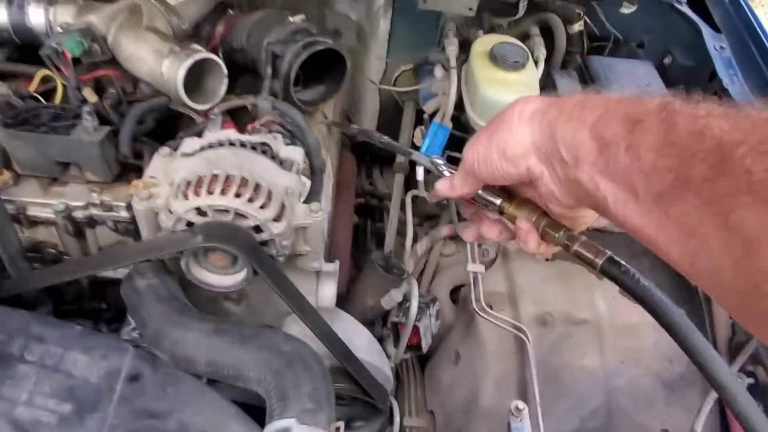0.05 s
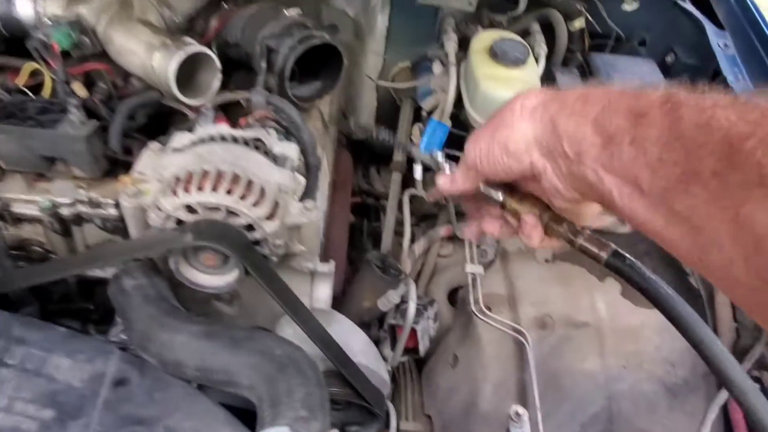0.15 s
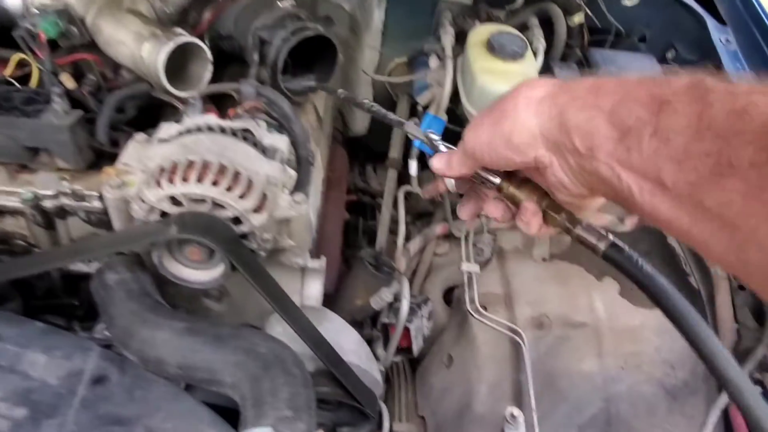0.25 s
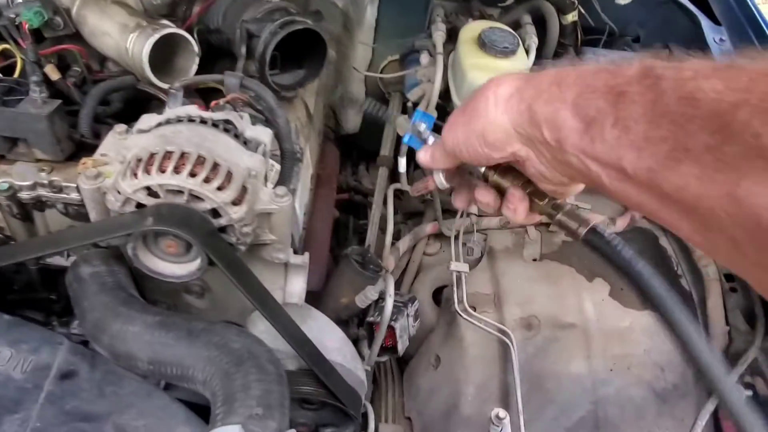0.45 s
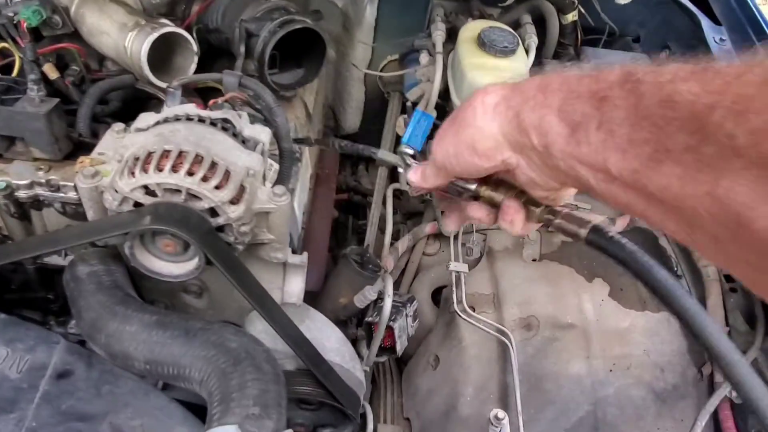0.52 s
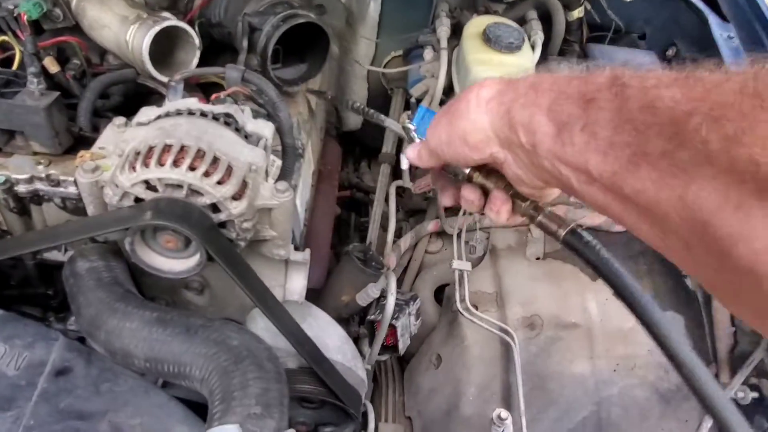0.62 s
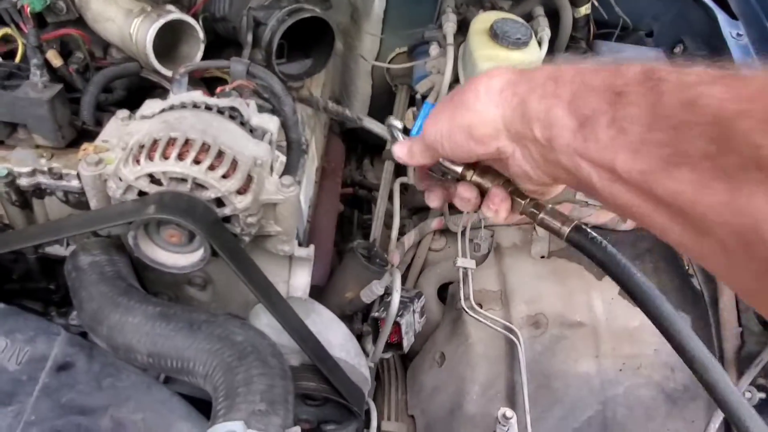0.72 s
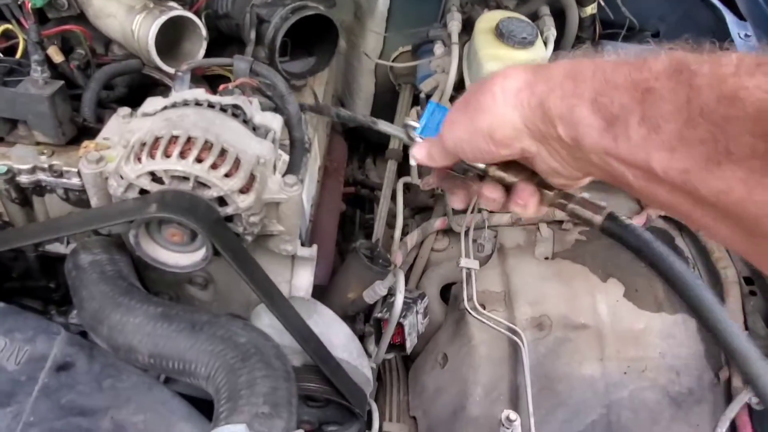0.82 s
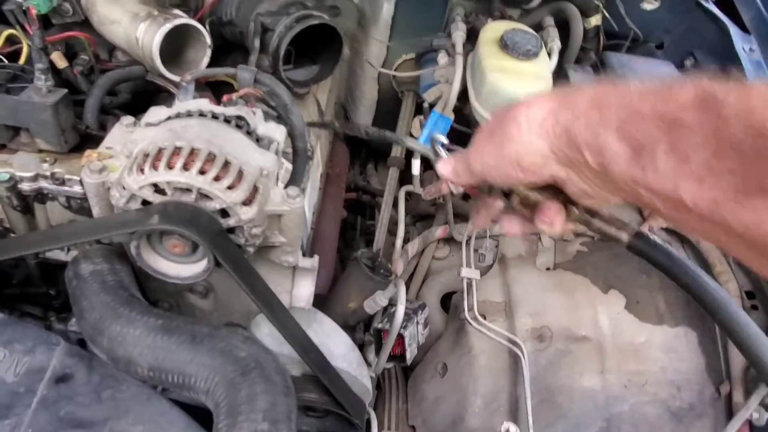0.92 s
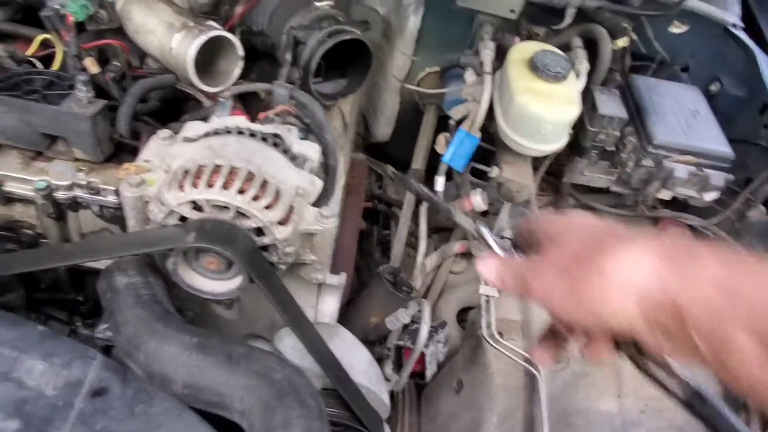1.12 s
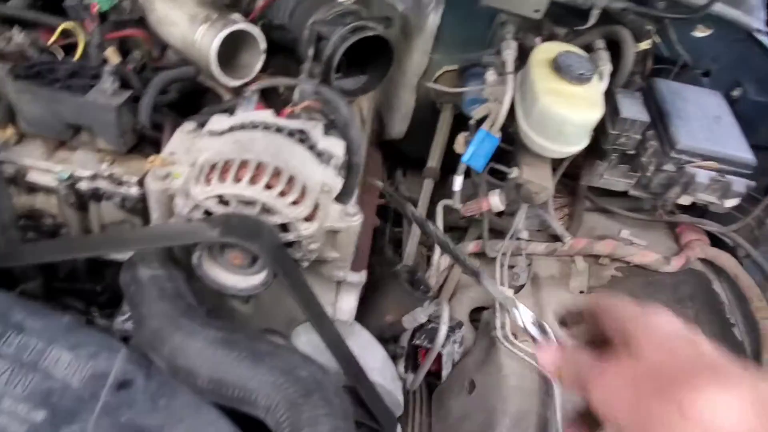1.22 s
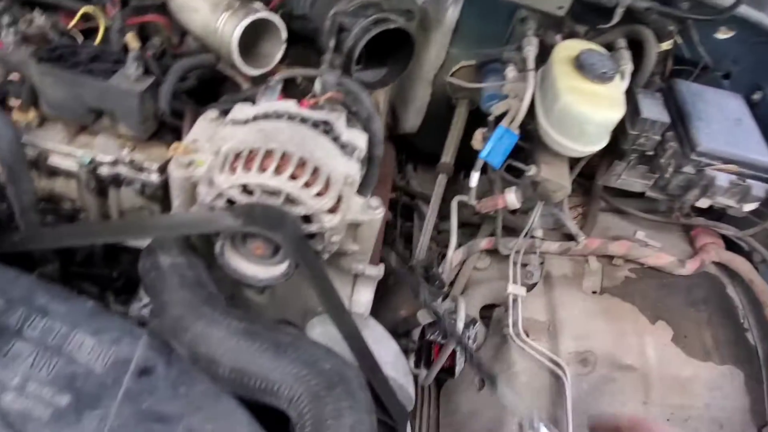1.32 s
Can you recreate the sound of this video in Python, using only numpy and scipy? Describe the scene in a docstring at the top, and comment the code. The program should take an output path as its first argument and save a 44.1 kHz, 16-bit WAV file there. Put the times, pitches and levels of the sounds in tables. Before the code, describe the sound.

A long hissing blast of compressed air sweeps over engine parts, flickering, then cuts off sharply

```python
"""Blow gun over an engine

One long blast of compressed air sweeps over an engine, an arm's length from a camera: flickering bands
of noise for the free jet's hiss and its roar on edges and faces, narrow noise for ringing pipes and hollows.
Leaking-valve noise starts before the blast and swells under it; a compressor motor hums in harmonics over
a low garage noise. Soft one-cycle thumps come before the blast, and after it as the gun is drawn back."""
import sys
import numpy as np
from scipy import signal
from scipy.fft import rfft, irfft
from scipy.io import wavfile
from scipy.ndimage import uniform_filter1d, map_coordinates

SR = 44100
rng = np.random.default_rng(int(sys.argv[2]) if len(sys.argv) > 2 else 0)


def dump(signal):
    """Clip the signal to [-1, 1] and save it as 16-bit WAV at the path in sys.argv[1]."""
    limited = np.clip(np.atleast_2d(signal).T, -1, 1)
    pcm = np.round(limited * 32767).astype(np.int16)
    wavfile.write(sys.argv[1], SR, pcm)


N = 59535
T = np.arange(N) / SR  # s
HZ = np.arange(N // 2 + 1) * SR / N
PORT_LINK = .3  # share of the side that follows the mid


def undb(db):
    """Decibels to an amplitude factor."""
    return 10 ** (np.asarray(db) / 20)


def level(x, db):
    """Scale a sound to an RMS level in dB."""
    return x * undb(db) / np.sqrt(np.mean(x ** 2))


def curve(table, col=1):
    """A column of a table, joined by straight lines in time."""
    table = np.array(table)
    return np.interp(T, table[:, 0], table[:, col])


def on_hz(table, hz):
    """A spectrum table read on a log-frequency axis."""
    table = np.array(table)
    return np.interp(np.log(hz + 1), np.log(table[:, 0]), table[:, 1])


def walk(rate):
    """Random levels held 1 / rate s and slewed twice; spread near 1."""
    hold = int(SR / rate)
    steps = np.repeat(rng.standard_normal(N // hold + 1), hold)
    slewed = uniform_filter1d(uniform_filter1d(steps, hold), hold)
    return 1.25 * slewed[:N]


def noise(gain, side_db):
    """Left and right noise with a gain per frequency; part of the side is the mid turned a quarter cycle."""
    mid, side = rfft(rng.standard_normal((2, N))) * gain
    side = np.sqrt(1 - PORT_LINK ** 2) * side + 1j * PORT_LINK * mid
    side = side * undb(side_db)
    return irfft(np.array([mid + side, mid - side]), N)


def bands(table, lo_hz, hi_hz, side_db, flicker_db, rate, count=3):
    """Noise of a given colour in about count overlapping bands an octave, each flickering alone."""
    edge = np.geomspace(lo_hz, hi_hz, 2 + int(count * np.log2(hi_hz / lo_hz)))
    step = np.log(edge[1] / edge[0])
    colour = undb(on_hz(table, HZ))
    out = 0
    for centre in np.sqrt(edge[1:] * edge[:-1]):
        steps_away = np.clip(np.log((HZ + 1) / centre) / step, -1, 1)
        share = np.cos(np.pi / 2 * steps_away)
        out = out + undb(flicker_db * walk(rate)) * noise(colour * share, side_db)
    return out


def resonance(hz, width_hz, side_db):
    """Air noise through one resonance, at unit RMS; the width is where the amplitude halves."""
    return level(noise(1 / (1 + ((HZ - hz) / (width_hz / 2)) ** 2), side_db), 0)


def garage_air():
    """Low, wide background noise that wavers slowly."""
    # Each row: frequency in Hz, relative density in dB per Hz.
    colour = [(20, -20), (50, -4), (110, -3), (220, -11), (310, -25), (450, -22), (700, -21), (1000, -28),
              (1600, -30)]
    return level(bands(colour, 23.2, 1500, side_db=-1, flicker_db=1.4, rate=7.5), -57)


def motor():
    """Multiples of the compressor's turning rate, loosely in step so that each stroke throbs."""
    # Each row: multiple of the turning rate, relative level in dB.
    harmonics = [(1, -5), (2, -3), (3, -10.5), (4, -7), (5, -12), (6, -12), (7, -14.5), (8, -15.5),
                 (9, -13.5), (10, -8), (11, -9.5), (12, -3.5), (13, -4.5), (14, -8), (15, -10), (16, -25),
                 (17, -12)]
    # Each row: time in seconds, level of the whole hum in dB.
    loudness = [(0, -56), (.2, -53), (.3, -59.5), (1.15, -59), (1.2, -62.5), (1.35, -63)]
    turn_hz, stroke_s = 57.64, .0075
    waver_db, slip_rad, spread_rad = 3.5, .9, .7
    turn = 2 * np.pi * turn_hz * (T - stroke_s)
    ear_phase = np.array([[0], [.6]])  # radians, left and right
    hum = 0
    for k, db in harmonics:
        strength = undb(db + waver_db * walk(14))
        slip = slip_rad * walk(5.92) + spread_rad * rng.standard_normal()
        hum = hum + strength * np.cos(k * turn + slip + ear_phase)
    return level(hum, 0) * undb(curve(loudness))


def thumps():
    """Dull bumps of about one cycle: a sine under a bell-shaped swell."""
    # Each row: centre in seconds, sine level before the swell in dB, frequency in Hz
    # (negative when the push comes first).
    bumps = [(.015, -48, 60), (.048, -49, 85), (.165, -49, 110), (.21, -49, 75), (1.205, -51, -110),
             (1.2278, -40.5, 75), (1.255, -53, -110), (1.2805, -48, 95)]
    cycles = .55  # half-length of the swell, to 1/e
    out = 0
    for s, db, hz in bumps:
        swell = np.exp(-((T - s) * hz / cycles) ** 2)
        out = out + undb(db) * swell * np.sin(2 * np.pi * hz * (T - s))
    return out


def valve_leak():
    """Air seeping through the valve: a thin flickering hiss that grows, then drops as the blast ends."""
    # Each row: frequency in Hz, relative density in dB per Hz.
    colour = [(590, -13), (1000, -4), (1050, -28), (1110, -12), (1780, -10.5), (2610, -13), (3400, -7),
              (6060, -13.5), (15800, -3.5)]
    # Each row: time in seconds, level in dB.
    loudness = [(0, -53), (.2, -46.5), (1.17, -34), (1.2, -56), (1.35, -54)]
    hiss = bands(colour, 924, 16270, side_db=0.48, flicker_db=2.44, rate=17.8)
    return level(hiss, 0) * undb(curve(loudness))


def buffeting(side_db):
    """Bass noise of the blast, surging in an upper and a lower band."""
    # Each row: time in seconds, upper band level in dB, lower band level in dB.
    surges = [(0.2, -71, -57), (0.26, -52.5, -58), (0.42, -61, -57.5), (0.47, -57, -77), (0.528, -54, -52),
              (0.584, -72, -80), (0.648, -57, -49.5), (0.7, -51.5, -83), (0.748, -72, -57.5),
              (0.846, -55.5, -72), (1.018, -72, -67), (1.034, -60.5, -60), (1.104, -66.5, -66),
              (1.2, -65, -52)]
    colour = [(35, -11), (250, 2.5)]  # Hz, relative dB per Hz
    out = 0
    for col, (lo, hi) in enumerate([(138, 253), (45.8, 124)], start=1):
        rumble = bands(colour, lo, hi, side_db, flicker_db=2.5, rate=25.7)
        out = out + level(rumble, 0) * undb(curve(surges, col))
    return out


def hollow_rings(side_db):
    """Hollows and gaps that ring briefly as the jet crosses them: narrow noise in bell-shaped swells."""
    # Each row: centre in seconds, half-length to 1/e in seconds, frequency in Hz, level at the crest in dB.
    hollows = [(0.235, 0.0055, 690, -40), (0.266, 0.025, 1257, -39.5), (0.305, 0.017, 2200, -37),
               (0.313, 0.032, 2180, -40), (0.31, 0.08, 7300, -35.5), (0.38, 0.02, 1800, -37),
               (0.36, 0.036, 1080, -45), (0.417, 0.012, 680, -42), (.431, 0.016, 2690, -34.5),
               (0.52, .008, 2750, -42), (.486, 0.0099, 3950, -35), (0.38, 0.016, 6100, -39.5),
               (0.474, 0.012, 507, -39.5), (0.492, 0.013, 2144, -37), (0.507, 0.012, 4100, -36.5),
               (0.477, 0.027, 1590, -37.5), (0.526, 0.016, 1160, -41), (0.644, 0.0095, 2900, -32),
               (0.636, 0.021, 4270, -41), (0.691, 0.022, 4060, -37), (0.684, 0.02, 1400, -40),
               (0.715, 0.022, 1933, -43.5), (0.799, 0.015, 6740, -31), (0.85, 0.031, 646, -43.5),
               (0.877, 0.012, 6240, -34), (0.517, 0.013, 6440, -35), (0.35, 0.014, 5500, -36),
               (1.154, 0.016, 5900, -34.5), (0.954, 0.012, 2045, -42), (1.047, 0.065, 2240, -43.5),
               (1.08, 0.028, 4300, -43), (1.12, .025, 3900, -41), (0.99, 0.012, 4225, -41)]
    out = 0
    for s, length, hz, db in hollows:
        swell = np.exp(-((T - s) / length) ** 2)
        ring = resonance(hz, 60 + .014 * hz, side_db)
        out = out + level(ring * swell, db) * np.sqrt(np.mean(swell ** 2))
    return out


def jet_roar(side_db):
    """Turbulent noise in six regions, with lasting metal resonances, as the jet sweeps over the parts."""
    # Each row: time in seconds, then levels in dB of: free jet hiss, sizzle on edges, roar on edges,
    # roar on faces, upper hollow, lower hollow.
    sweep = [(0.226, -31, -36.5, -41.5, -40, -36, -44), (0.26, -31.5, -34, -39.5, -41, -35.5, -43.5),
             (0.322, -30, -28, -35, -37, -37.5, -40), (0.346, -27.5, -29.5, -34, -38, -36.5, -48),
             (0.362, -32.5, -33, -39, -36.5, -38, -38.5), (0.408, -31.5, -38, -40.5, -44, -39.5, -42),
             (0.432, -28, -29, -29.5, -30, -38.5, -37.5), (0.462, -32.5, -36.5, -38, -38, -44, -45.5),
             (0.508, -27.5, -29.5, -36.5, -33, -41, -37.5), (0.524, -32, -31, -35.5, -37, -39.5, -41.5),
             (0.542, -31, -30.5, -34, -40, -45, -48), (0.556, -28, -39.5, -38.5, -52.5, -51, -54.5),
             (0.582, -29.5, -35, -42, -45.5, -63.5, -51.5), (0.61, -36.5, -42.5, -39.5, -47, -49, -62),
             (0.62, -30, -34.5, -33.5, -36, -38, -35), (0.63, -30, -28.5, -28, -39, -44, -55),
             (0.642, -32.5, -37.5, -36.5, -35, -44.5, -36.5), (0.672, -34, -40.5, -39, -43.5, -47, -61),
             (0.692, -29, -30.5, -27, -29.5, -42.5, -44), (0.706, -37, -36.5, -47, -47, -51, -46.5),
             (0.726, -31.5, -32, -33.5, -37, -44, -46.5), (0.752, -33.5, -41.5, -40, -53, -57, -53),
             (0.774, -29, -38, -39.5, -47, -48, -57), (0.786, -34, -31.5, -33.5, -40.5, -45, -50),
             (0.804, -24, -29, -33.5, -45, -44.5, -51.5), (0.836, -36, -41, -39.5, -46.5, -46, -41),
             (0.866, -29.5, -37.5, -39, -43.5, -46.5, -43.5), (0.878, -27.5, -30, -30.5, -41, -49, -44),
             (0.908, -26, -34, -48, -52, -61, -60), (0.926, -33.5, -39, -39, -50, -64, -49),
             (0.942, -27.5, -36.5, -35, -37, -45, -53), (0.96, -29, -31, -34.5, -38.5, -42.5, -42.5),
             (0.984, -40, -57, -50, -51.5, -59, -57), (1.034, -30.5, -36.5, -40.5, -40, -44.5, -44.5),
             (1.052, -35, -34, -36.5, -35, -51, -64), (1.072, -33, -43, -37, -35, -42.5, -48),
             (1.114, -31.5, -31.5, -39, -42, -51.5, -49), (1.148, -29.5, -30, -32.5, -39, -44, -50.5),
             (1.163, -39, -37, -34, -39.5, -49, -44.5)]
    # Borders of these regions in Hz, from the lower hollow up to the free jet.
    borders = [420, 1000, 1750, 3400, 6000, 10000, 15900]
    # Each row: frequency in Hz, relative density in dB per Hz.
    colour = [(300, -30), (385, -6), (432, -8), (485, -6.5), (654, 8.5), (927, -6), (1270, -4.5),
              (1800, -15), (1950, -14), (2680, -7), (2960, -14), (3990, -8), (5940, -11), (6450, -5.5),
              (8000, -9), (15800, -2)]
    # Lasting resonances. Each row: frequency in Hz, width in Hz, level in dB over the region's roar.
    metal = [(677, 270, -7.5), (1270, 240, -8), (15200, 510, -6.5)]
    flicker_db, flicker_rate, grit_db = 2.5, 29.98, 1  # rate in steps per second
    swing_db, swing_rate = 3, 25.06
    calm_hz = 5000  # regions that start above this flicker less
    grit = walk(700)
    out = 0
    for k, (lo, hi) in enumerate(zip(borders, borders[1:])):
        calm = min(1, calm_hz / lo)
        part = level(bands(colour, lo, hi, side_db, flicker_db * calm, flicker_rate, count=5), 0)
        for hz, width, db in metal:
            if lo <= hz < hi:
                ring = resonance(hz, width, side_db)
                swing = swing_db * calm * walk(swing_rate)
                part = part + ring * undb(db + swing)
        if k > 1:  # fine grit only above the two hollows
            part = part * undb(grit_db * grit)
        col = len(borders) - 1 - k  # the sweep lists the regions from the top down
        out = out + level(part, 0) * undb(curve(sweep, col))
    return out


def blast():
    """Roar, rings and buffeting of the air jet, opened and shut by the trigger."""
    # Width of the blast: a surface near the microphones turns some regions out of phase.
    # Each row: frequency in Hz, side minus mid in dB.
    width = [(100, -28), (400, -5), (680, -17), (1200, -15), (1600, 6), (1900, -5.5), (2400, -12),
             (3100, 4.5), (4000, -11.5), (5000, -2), (7000, -1), (10000, -0.5), (15000, -4)]
    # Each row: time in seconds, seconds by which the right port hears the jet later.
    lag = [(.2, 0), (.5, .00001), (.62, .00005), (1.2, .00005)]
    open_s, attack_s, shut_s, release_t60_s = 0.2154, 0.0074, 1.167, 0.05
    pan_db = -0.36  # left minus right
    side_db = on_hz(width, HZ)
    air = jet_roar(side_db) + hollow_rings(side_db) + buffeting(side_db)
    opening = np.clip((T - open_s) / attack_s, 0, 1) ** 2
    shutting = undb(-60 * np.clip(T - shut_s, 0, 1) / release_t60_s)
    left, right = air * opening * shutting * undb([[pan_db / 2], [-pan_db / 2]])
    late = [(T - curve(lag)) * SR]
    return np.array([left, map_coordinates(right, late, order=3, mode="nearest")])


def engine_bay(x):
    """A short dense tail off the metal around: decaying noise convolved with the sound."""
    t60_s, tail_db = 0.087, -9.5  # tail level ahead of the smoothing
    t = T[:SR // 4]
    tail = rng.standard_normal((2, len(t))) * undb(-60 * t / t60_s)
    tail = level(tail, tail_db) / np.sqrt(len(t))
    tail = uniform_filter1d(tail, size=3, axis=1)  # dulls the treble
    return x + signal.fftconvolve(x, tail, axes=1)[:, :N]


def scene():
    """The blast echoes in the engine bay; the other layers stay dry."""
    leak = valve_leak()
    garage = garage_air()
    return engine_bay(blast()) + leak + garage + motor() + thumps()


def record(dry):
    """The camera cuts the top steeply, above 15800 Hz."""
    return signal.sosfilt(signal.ellip(12, .3, 80, 15800, fs=SR, output="sos"), dry)


dry = scene()
out = record(dry)
dump(out)
```